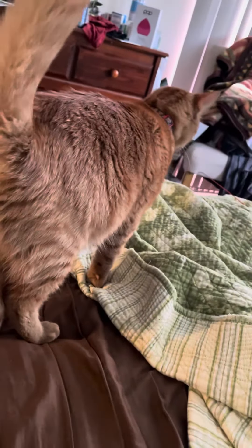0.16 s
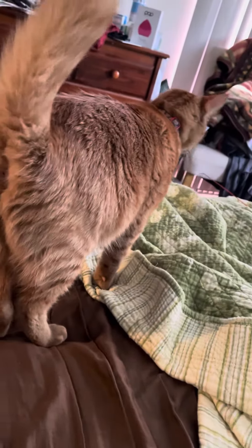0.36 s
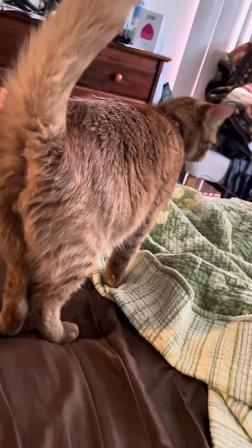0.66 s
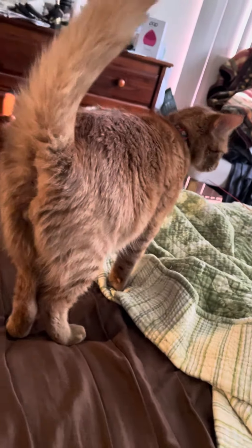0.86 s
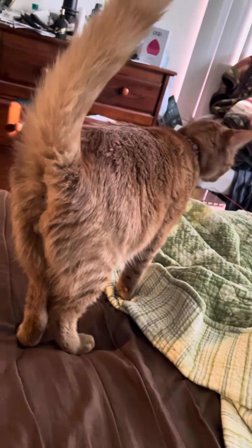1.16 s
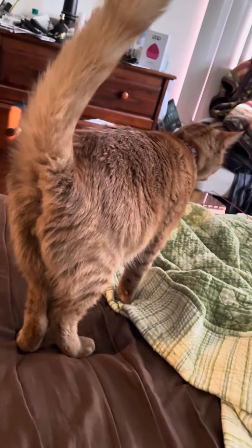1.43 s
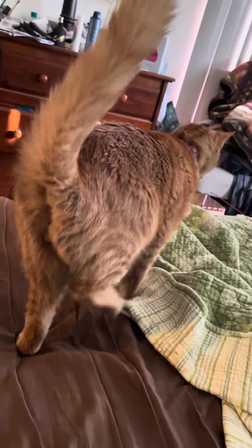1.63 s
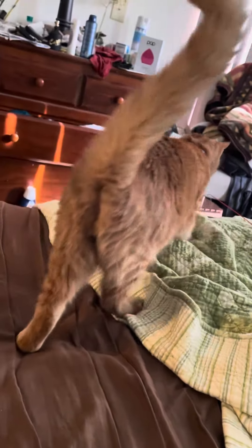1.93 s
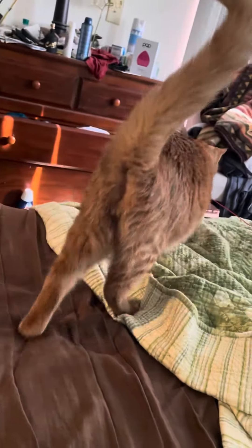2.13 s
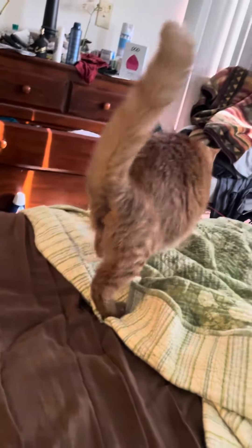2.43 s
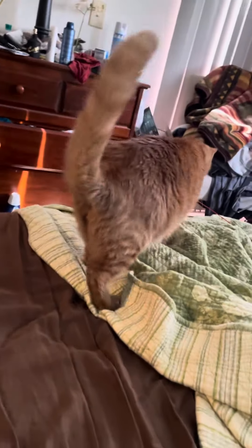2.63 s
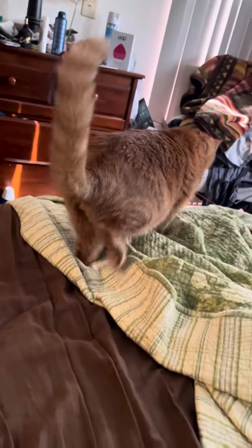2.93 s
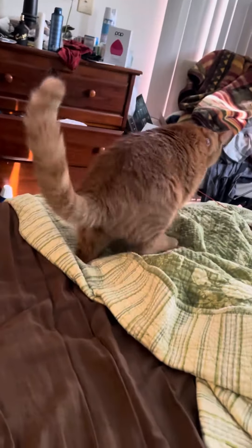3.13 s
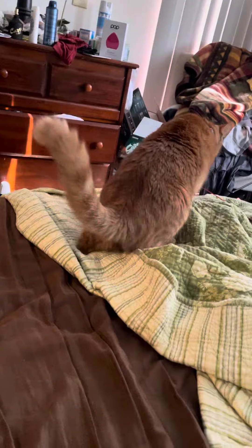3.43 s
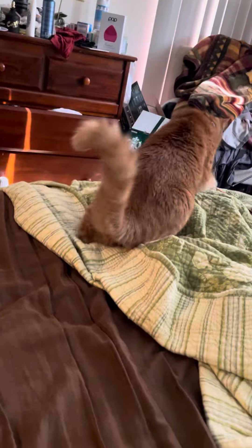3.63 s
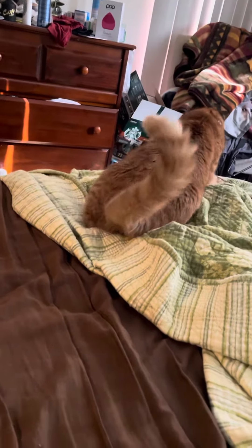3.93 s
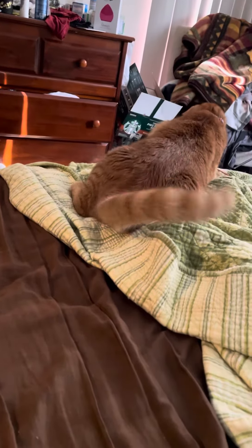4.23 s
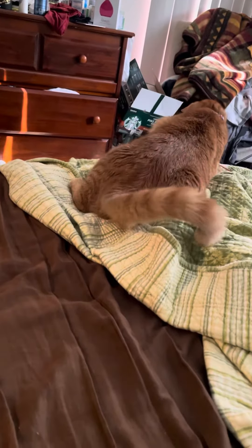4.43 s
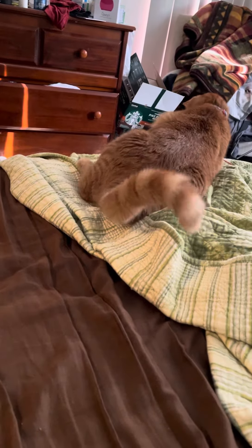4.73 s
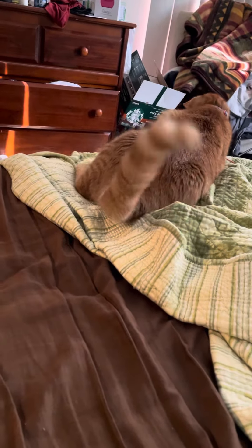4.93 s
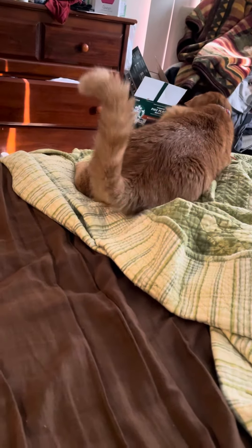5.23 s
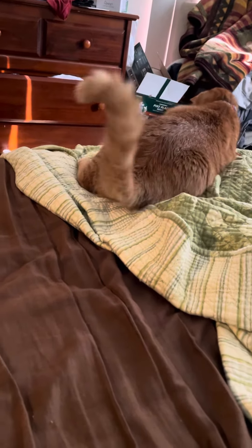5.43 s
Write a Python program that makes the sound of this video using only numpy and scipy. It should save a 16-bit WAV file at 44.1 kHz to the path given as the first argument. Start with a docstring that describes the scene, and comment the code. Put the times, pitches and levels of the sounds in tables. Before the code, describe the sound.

Muffled low knocks from a cat stepping and settling on bedding, small claw ticks, light brushing, and a quiet room with far traffic.

```python
"""A cat shifts about on a bed close by. Far traffic rumbles, an engine drones and a deep tone wavers below.
From the start soft knocks thud through the bed frame, claws and threads tick, and fur slides over the covers.
From 0.7 s a soft hiss puffs once a second, strong and weak in turn; a faint narrow murmur comes and goes.
After the last knock, near 4 s, the collar tag tinks once and one more stroke of fur follows.
Sines make thuds, rings and tones; shaped noise makes the rest; a small furnished room answers."""
import sys
import numpy as np
from scipy import signal
from scipy.fft import rfft, irfft, next_fast_len
from scipy.io import wavfile
from scipy.ndimage import uniform_filter1d, map_coordinates

SR = 44100
rng = np.random.default_rng(int(sys.argv[2]) if len(sys.argv) > 2 else 0)


def master(y):
    """Save y as 16-bit WAV."""
    cut = np.clip(np.atleast_2d(y).T, -1, 1)
    pcm = np.round(cut * 32767)  # scale
    wavfile.write(sys.argv[1], SR, pcm.astype(np.int16))


N = 246068

# Far traffic. Each row: time in seconds, rumble level in dB, room murmur level in dB.
TRAFFIC_LEVELS = [(0, -50.5, -66.5), (.35, -59, -79), (1, -56.5, -69.5), (1.3, -58, -80),
                  (1.55, -55.5, -78), (1.8, -56, -72), (2.05, -58, -79.5), (2.4, -59, -79.5),
                  (2.95, -56.5, -76.5), (3.45, -62.5, -83), (3.75, -62, -75), (4.1, -60, -81.5),
                  (4.45, -63, -85), (5.1, -61.5, -80.5), (5.58, -64.5, -84)]
# Engine far off. Each row: time in seconds, pitch in Hz, level in dB.
ENGINE_CURVE = [(0, 208, -80), (.5, 208, -67.5), (1, 200.1, -60), (1.85, 193, -62.5), (2, 179.3, -55.5),
                (2.5, 171.6, -67.5), (3.9, 164, -85.5), (4.1, 168.6, -64.5), (5.15, 178, -63),
                (5.58, 180, -76.5)]
# Deep wavering tone. Each row: time in seconds, pitch in Hz, level in dB.
DEEP_TONE_CURVE = [(.6, 65, -75), (1, 65.2, -57.5), (1.5, 64.2, -63), (2.1, 53.7, -57), (2.45, 52.4, -57),
                   (2.95, 51.76, -61.5), (3.25, 54.9, -53), (3.45, 64, -55), (3.75, 63.35, -63),
                   (4.25, 52.4, -59), (4.7, 54.52, -63.5), (5.3, 55.2, -57.5), (5.58, 54.8, -68)]
# Noise spectra of the background. Each row: frequency in Hz, relative level in dB per Hz.
RUMBLE_SPECTRUM = [(15, -40.5), (25, -21), (38, -12.5), (55, -1), (76, -1), (118, -4.5), (160, -11),
                   (215, -8), (260, -20.5), (320, -35), (450, -70.5)]
MURMUR_SPECTRUM = [(200, -33), (300, 6), (500, 1.5), (900, -11.5), (1600, -16.5), (2500, -36)]
HISS_SPECTRUM = [(530, -20.5), (900, -1.5), (1520, -5), (1840, -6), (2130, -6), (3040, -11.5), (4150, -9.5),
                 (7530, -16), (9440, -20), (15600, -33)]

# Faint narrow murmur. Each row: start of hold in seconds, end of hold in seconds, level in dB.
AIRY_SPANS = [(0.877, 1.143, -78.5), (1.665, 2.046, -88), (3.003, 3.086, -88)]
# Its bands. Each row: centre in Hz, width in Hz, relative level in dB.
AIRY_BANDS = [(1504, 210, 4), (2220, 250, -8.5), (3240, 97, -8)]
AIRY_RISE_S, AIRY_FALL_S = 0.06, 0.073

# Puffs, used in turn. Each row: peak level in dB, hollow part over it in dB.
PUFF_TURNS_DB = [(-68, -4), (-75, -14)]
# Airy and hollow parts of a puff. Each row: frequency in Hz, relative level in dB per Hz.
PUFF_AIRY_SPECTRUM = [(290, -59), (500, -2.5), (684, -31), (828, -6.5), (1550, -3), (2500, -15),
                      (2900, -8.5), (7230, -23), (13000, -33.5)]
PUFF_HOLLOW_SPECTRUM = [(550, -49), (700, 8), (870, 8), (1050, 5), (1300, -27)]
PUFF_FIRST_S, PUFF_EVERY_S, PUFF_RISE_S, PUFF_FALL_S = 0.7134, 1.0005, 0.02, 0.051

# Fur over cloth, one curve a stroke. Each row: time in seconds, level in dB, then over that level
# the fine treble in dB, the swish band in dB, the body band in dB.
FUR_STROKES = [
    [(.03, -67, -13, 0, 1), (.17, -77, -15.5, -6, -11.5), (.64, -74, -9.5, -3.5, -5.5),
     (.73, -66.5, -11, -6, -5), (.805, -68, -11, -5, -3), (.87, -77, 0, -6, -8),
     (1.064, -79.5, -3.5, -1, -3.5), (1.14, -103, -14, 0, 8)],
    [(2.65, -75, -7, -1.5, 4), (2.7, -78.5, -4, -9, 1), (2.765, -76, -4, -7, 6)],
    [(4.51, -104, 6, 4, 4.5), (4.61, -78, 1.5, -1.3, -9), (4.71, -70, -5, -9, -12.5),
     (4.79, -73.5, 0.5, -5, -5), (4.9, -74, 2.5, -5.5, -2.5), (5.03, -74.5, -0.5, -13.5, -11.5),
     (5.1, -80.5, -4, -17, -10), (5.14, -105, -5, -3, 7)],
]
# Cloth weave, fine fibres, swish, padding. Each row: frequency in Hz, relative level in dB per Hz.
WEAVE_SPECTRUM = [(2700, -38), (3200, -3.5), (3700, -3.5), (4400, -5.5), (5400, -2.5), (6500, -8.5),
                  (8000, -20)]
NAP_SPECTRUM = [(6000, -58), (7000, -5.5), (10500, -4.5), (13000, -5.5), (16000, -6)]
SWISH_SPECTRUM = [(1900, -34), (2300, 2.5), (2650, 2), (3050, -1), (3500, -35)]
PADDING_SPECTRUM = [(600, -18), (1000, -3.5), (1350, -7), (1700, -1), (2150, 0.5), (2600, -54)]

# Collar tag modes. Each row: frequency in Hz, level in dB.
TAG_MODES = [(5060, -83), (5000, -76), (12300, -92)]
TAG_START_S = 4.191

# Dry ticks of claws and threads. Each row: start in seconds, level in dB, pitch in Hz, then over that
# level the crack in dB, the afterglow in dB.
TICK_EVENTS = [(.004, -36.5, 4530, 3.5, -32), (0.24, -55.5, 1920, -28, -25),
               (0.8054, -57.5, 5450, 14.5, -32), (.8744, -69, 5000, 3, -30), (1.8357, -66, 1680, -1.5, -41),
               (2.3308, -58.5, 4820, 4, -13), (2.361, -60, 1920, -9, -23), (2.642, -59.5, 5300, 9, -35),
               (2.7748, -48.5, 5900, 0.5, -25), (5.04, -67, 5654, -1, -30)]
# Noise of a tick. Each row: frequency in Hz, relative level in dB per Hz.
CRACK_SPECTRUM = [(300, -36), (600, 6.5), (2200, -2), (3500, -7.5), (5200, -2.5), (10000, -18),
                  (16000, -30)]

# Knocks. Each row: start in seconds, thud level in dB, knock noise in dB, scuff noise in dB,
# wooden ring in dB, final pitch in Hz, centre of the ring in Hz, thud t60 in seconds,
# floor boom over the thud in dB.
KNOCK_EVENTS = [(.003, -20.5, -42.5, -52, -32.5, 112.7, 1040, 0.13, -18),
                (.018, -18, -62, -72, -64, 104, 420, 0.075, -20.5),
                (.194, -33.5, -68, -75, -71.5, 106, 466, 0.072, -23),
                (0.8048, -30.5, -55, -72, -46.5, 87, 800, 0.12, -10.5),
                (0.85, -26.5, -78.5, -77, -72, 86, 400, .049, -27),
                (1.8644, -15.5, -52.5, -70.5, -44.5, 136, 960, 0.027, -21),
                (1.872, -17, -62, -73.5, -44, 84, 390, 0.074, -20.5),
                (2.456, -29.5, -61.5, -71, -55, 115, 1030, 0.088, -25),
                (2.5506, -27, -59.5, -70, -49.5, 110.8, 1150, 0.13, -16.5),
                (2.624, -27.5, -57, -75, -57, 118, 1123, 0.12, -22),
                (2.635, -22.5, -43.5, -65.5, -37, 92, 665, 0.13, -12),
                (2.747, -21.5, -52, -63, -44, 107.5, 794, 0.083, -15.5),
                (2.777, -18, -40.5, -47.5, -30.5, 102, 1500, .08, -20.5),
                (2.806, -24.5, -52.5, -70, -47, 85.5, 430, 0.12, -9.5),
                (3.163, -14.5, -49, -62, -50, 112, 610, 0.074, -26),
                (3.969, -16, -53.5, -62, -45, 110.7, 567, 0.082, -23)]
# Knock and scuff noise. Each row: frequency in Hz, relative level in dB per Hz.
KNOCK_SPECTRUM = [(150, -45), (300, 2), (600, -6.5), (1200, -15), (2200, -28), (3500, -46.5)]
SCUFF_SPECTRUM = [(700, -43), (1200, 2.5), (2000, 1.5), (4000, -5.5), (6000, -10.5), (10000, -22.5),
                  (13000, -25), (16000, -33)]
# Bed frame modes. Each row: frequency in Hz, t60 in seconds.
FRAME_MODES = [(345, .05), (417, 0.12), (520, 0.052), (581, 0.052), (785, 0.029), (950, 0.017),
               (1150, 0.015), (1400, 0.0062), (1830, 0.011), (2300, 0.0032)]
# Modes of the floor under the bed. Each row: frequency in Hz, relative level in dB, t60 in seconds.
FLOOR_MODES = [(65.6, -3.5, 0.12), (83.6, 9.5, 0.11)]
CLOTH_TAIL_T60_S = 0.21

# Width of diffuse sound. Each row: frequency in Hz, side over mid in dB.
DIFFUSE_WIDTH = [(60, -25), (200, -14), (380, -2.5), (700, 4.5), (1300, 0), (2400, -6), (5000, -3.5),
                 (8000, 3), (15000, 1)]
# Decay of the room. Each row: frequency in Hz, t60 in seconds.
ROOM_T60 = [(80, 0.29), (300, 0.3), (2000, 0.26), (10000, 0.089)]
# Centre: hollow near 7.5 kHz, dull at the top. Each row: frequency in Hz, gain in dB.
MID_COLOUR = [(6300, -1), (6900, -5), (7100, -19.5), (8100, -22), (8400, -6.5), (9600, 2.5), (12900, 2.5),
              (13600, -21), (16000, -9.5)]
# Sides: hollow near 11 kHz. Each row: frequency in Hz, gain in dB.
SIDE_COLOUR = [(9500, 0.5), (10400, -18.5), (11700, -26), (12100, 0.5)]
BAND_LIMIT_HZ = 15800


def amp(db):
    """dB to gain."""
    return 10 ** (np.asarray(db) / 20)


def unit(x):
    """Scaled to rms 1."""
    return x / np.sqrt(np.mean(x ** 2) + 1e-20)


def along(points, hz):
    """(Hz, value) points interpolated on a log frequency axis."""
    f, v = np.transpose(points)
    return np.interp(np.log(hz + 1), np.log(f + 1), v)


def shape(points):
    """The gain of a spectrum table as a function of frequency."""
    return lambda hz: amp(along(points, hz))


def curves(rows):
    """One value per sample for each column after the time."""
    s, *cols = np.transpose(rows)
    return [np.interp(np.arange(N) / SR, s, c) for c in cols]


def wobble(rate_hz):
    """A smooth random curve, rate_hz knots a second."""
    knots = rng.standard_normal(int(N * rate_hz / SR) + 4)
    return map_coordinates(knots, [np.arange(N) * rate_hz / SR])


def swell(start_s, end_s, rise_s, fall_s):
    """Gaussian rise up to start_s, hold, Gaussian fall after end_s."""
    t = np.arange(N) / SR
    before = np.maximum(start_s - t, 0) / rise_s
    after = np.maximum(t - end_s, 0) / fall_s
    return np.exp(-before ** 2 - after ** 2)


def onset(t, rise_s):
    """Exponential approach to 1."""
    return 1 - np.exp(-t / rise_s)


def sine(hz, t):
    """A steady sine."""
    return np.sin(2 * np.pi * hz * t)


def filtered(x, response):
    """x times a response of frequency."""
    m = next_fast_len(N + SR // 2)
    return irfft(rfft(x, m) * response(np.fft.rfftfreq(m, 1 / SR)), m)[..., :N]


def left_right(mid, side):
    """Mid and side to a stereo pair."""
    return np.array([mid + side, mid - side])


def diffuse(gain, grain_db=0., grain_rate_hz=300, patchy_db=0., wide_db=0.):
    """Stereo noise from all round, mid of rms 1, with grain in time and patches of colour."""
    grains = rng.standard_normal((2, N)) * amp(grain_db * wobble(grain_rate_hz))
    z = signal.stft(grains, nperseg=512)[2]
    field = uniform_filter1d(rng.standard_normal(z.shape[1:]), 7, 0)
    field = uniform_filter1d(field, 14, 1)
    pair = signal.istft(z * amp(patchy_db * unit(field)), nperseg=512)[1][:, :N]

    def response(hz):
        """Common colour, with the side set by the width table."""
        return gain(hz) * [np.ones_like(hz), amp(along(DIFFUSE_WIDTH, hz) + wide_db)]

    mid, side = filtered(pair, response)
    return left_right(mid, side) / np.std(mid)


def add(track, s, sound):
    """Mixes a sound in at s seconds."""
    start = round(s * SR)
    track[..., start:start + sound.shape[-1]] += sound


def cut(noise, length):
    """A stretch of noise from a random place."""
    k = int(rng.uniform(0, N - length))
    return noise[..., k:k + length]


def tone(rows, drift, flutter_db):
    """A sine whose pitch and level follow a curve and waver about it."""
    hz, db = curves(rows)
    phase = 2 * np.pi * np.cumsum(hz * (1 + drift * wobble(17))) / SR
    return np.sqrt(2) * amp(db + flutter_db * wobble(18)) * np.sin(phase)


def background():
    """Traffic through the walls, a far engine, a deep tone, the room's murmur, the microphone's hiss."""
    rumble_db, murmur_db = curves(TRAFFIC_LEVELS)
    rumble = amp(rumble_db + 2.2 * wobble(7.1)) * diffuse(shape(RUMBLE_SPECTRUM))
    engine = tone(ENGINE_CURVE, drift=0.01, flutter_db=1.13)
    deep_tone = tone(DEEP_TONE_CURVE, drift=0.04, flutter_db=2.0)
    murmur = amp(murmur_db + 0.45 * wobble(7.4)) * diffuse(shape(MURMUR_SPECTRUM), patchy_db=0.5)
    hiss = amp(-86.5) * diffuse(shape(HISS_SPECTRUM))
    return rumble + engine + deep_tone + murmur + hiss


def airy():
    """Faint noise through three narrow resonant bands."""
    def bands(f):
        """Sum of squared band-pass resonances."""
        return sum(amp(db) * np.abs(f * w / (c * c - f * f + 1j * f * w)) ** 2 for c, w, db in AIRY_BANDS)

    level = sum(amp(db) * swell(start, end, AIRY_RISE_S, AIRY_FALL_S) for start, end, db in AIRY_SPANS)
    return level * amp(0.83 * wobble(20)) * diffuse(bands)


def puffs():
    """Short soft hiss like a muffled clock: quick rise, slower fall, strong and weak in turn."""
    out = np.zeros((2, N))
    airy_part = diffuse(shape(PUFF_AIRY_SPECTRUM), grain_db=-1.0)
    hollow = diffuse(shape(PUFF_HOLLOW_SPECTRUM))
    for k, s in enumerate(np.arange(PUFF_FIRST_S, N / SR, PUFF_EVERY_S)):
        db, hollow_db = PUFF_TURNS_DB[k % len(PUFF_TURNS_DB)]
        level = amp(db) * swell(s, s, PUFF_RISE_S, PUFF_FALL_S)
        out += level * (airy_part + amp(hollow_db) * hollow)
    return out


def slides():
    """Dense fibre slips: weave, fine nap, swish and padding sound under the same stroke."""
    out, t = np.zeros((2, N)), np.arange(N) / SR
    weave = diffuse(shape(WEAVE_SPECTRUM), grain_db=1.0, patchy_db=1.5)
    nap = diffuse(shape(NAP_SPECTRUM), grain_db=1.0)
    swish = diffuse(shape(SWISH_SPECTRUM), grain_db=1.5, patchy_db=1.3)
    padding = diffuse(shape(PADDING_SPECTRUM), grain_db=1.0, patchy_db=2.5)
    for rows in FUR_STROKES:
        db, nap_db, swish_db, body_db = curves(rows)
        on = (t > rows[0][0]) & (t < rows[-1][0])
        stroke = weave + amp(nap_db) * nap + amp(swish_db) * swish + amp(body_db) * padding
        out += on * amp(db) * stroke
    return out


def collar_tag():
    """Tag modes ring briefly and unevenly until fur damps them."""
    out, t = np.zeros(N + SR), np.arange(SR // 5) / SR
    decay = amp(-60 * t / 0.26 + 4.0 * wobble(120)[:len(t)])
    fur_damping = 1 / (1 + (t / 0.087) ** 8)
    ring = sum(amp(db) * sine(hz, t) for hz, db in TAG_MODES)
    add(out, TAG_START_S, decay * onset(t, 0.0014) * fur_damping * ring)
    return out[:N]


def ticks():
    """Each tick is a short decaying sine, a crack of noise and a faint afterglow."""
    out, t = np.zeros(N + SR), np.arange(SR // 5) / SR
    crack = unit(filtered(rng.standard_normal(N), shape(CRACK_SPECTRUM)))
    snap = onset(t, 1 / 3000) * amp(-60 * t / 0.01)
    for s, db, hz, crack_db, glow_db in TICK_EVENTS:
        noise = cut(crack, len(t))
        add(out, s, amp(db) * snap * (sine(hz, t) + amp(crack_db) * noise))
        add(out, s, amp(db + glow_db - 60 * t / 0.15) * noise)
    return out[:N]


def thud(t, hz, t60_s, boom_db):
    """A bending wave arrives high first and sinks in pitch; the floor booms under it."""
    cycles = hz * t + 1.072 * onset(t, 0.0039) + 0.85 * onset(t, 0.01)
    wave = np.sin(2 * np.pi * cycles) * amp(-60 * t / t60_s)
    boom = sum(sine(f, t) * amp(boom_db + db - 60 * t / d) for f, db, d in FLOOR_MODES)
    return (wave + boom) * (1 - np.exp(-(t / 0.0095) ** 2))


def frame_ring(t, centre_hz):
    """The blow drives the frame modes near its own pitch hardest, with random spread."""
    ring = np.zeros(len(t))
    for hz, t60_s in FRAME_MODES:
        drive_db = rng.normal(0, 1.87) - 5.0 * np.log2(hz / centre_hz) ** 2
        ring += sine(hz, t) * amp(drive_db - 60 * t / t60_s)
    return ring * onset(t, 0.00084) * amp([[0.6], [-0.6]])  # left a little louder


def knocks():
    """Each blow sums a thud, a frame ring and decaying knock and cloth-scuff noise."""
    out, t = np.zeros((2, N + SR)), np.arange(SR // 2) / SR
    dull = diffuse(shape(KNOCK_SPECTRUM), grain_db=2.5, grain_rate_hz=310, wide_db=-8.0)
    bright = diffuse(shape(SCUFF_SPECTRUM), grain_rate_hz=290, patchy_db=1.5, wide_db=0.5)
    tail = onset(t, 0.00033) * amp(-60 * t / CLOTH_TAIL_T60_S)
    for s, thud_db, knock_db, scuff_db, ring_db, hz, centre_hz, t60_s, boom_db in KNOCK_EVENTS:
        add(out, s, amp(thud_db) * thud(t, hz, t60_s, boom_db))
        add(out, s, amp(ring_db) * frame_ring(t, centre_hz))
        # both noises are cut at the same place
        noise = cut(amp(knock_db) * dull + amp(scuff_db) * bright, len(t))
        add(out, s, tail * noise)
    return out[:, :N]


def room(x):
    """Decaying noise as the room's answer: each frequency dies at its own speed, the bass nearly mono."""
    hz, t, z = signal.stft(rng.standard_normal((2, SR // 2)), SR, nperseg=256)
    decay = amp(-60 * t / along(ROOM_T60, hz)[:, None])
    side_gain = amp(along(DIFFUSE_WIDTH, hz) - 17.5)[:, None]
    z = z * decay * [np.ones((len(hz), 1)), side_gain]
    mid, side = signal.istft(z, SR, nperseg=256)[1]
    tail = left_right(mid, side) / np.linalg.norm(mid)
    delayed = np.pad(x, (300, 0))  # samples
    return signal.fftconvolve(delayed[None], tail, axes=1)[:, :N]


def scene():
    """All layers; only knocks, ticks and the tag excite the room."""
    near = knocks() + ticks() + collar_tag()
    answer = amp(-16) * room(near.mean(0))
    return background() + airy() + puffs() + slides() + near + answer


def record(dry):
    """Centre and sides are coloured differently, each with its own hollow; nothing passes the band limit."""
    mid, side = (dry[0] + dry[1]) / 2, (dry[0] - dry[1]) / 2
    mid = filtered(mid, shape(MID_COLOUR))
    side = filtered(side, shape(SIDE_COLOUR))
    return filtered(left_right(mid, side), lambda hz: hz < BAND_LIMIT_HZ)


dry = scene()
out = record(dry)
master(out)
```